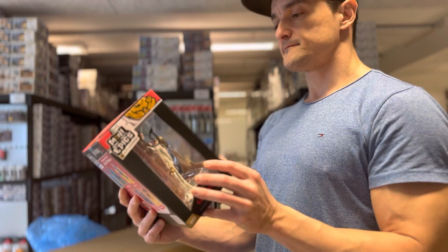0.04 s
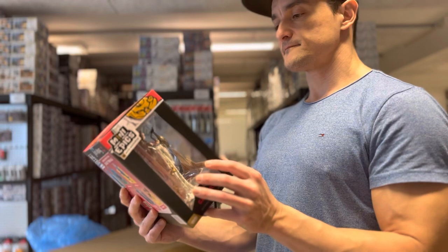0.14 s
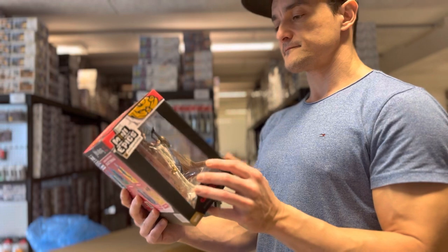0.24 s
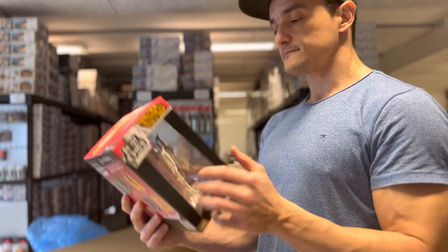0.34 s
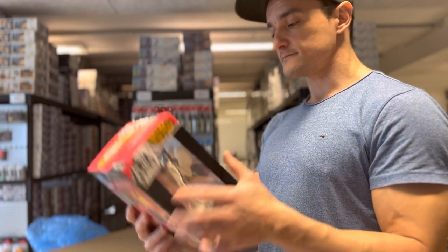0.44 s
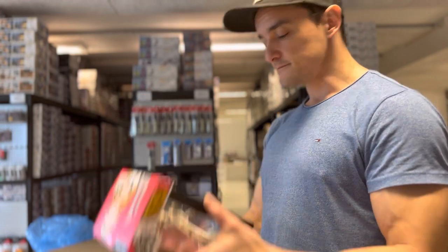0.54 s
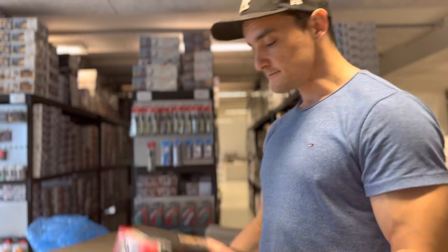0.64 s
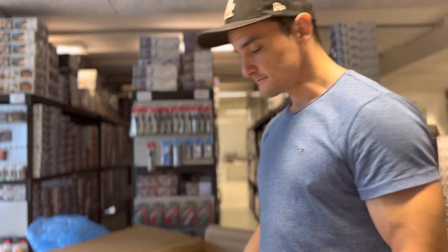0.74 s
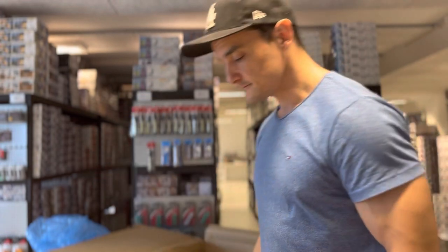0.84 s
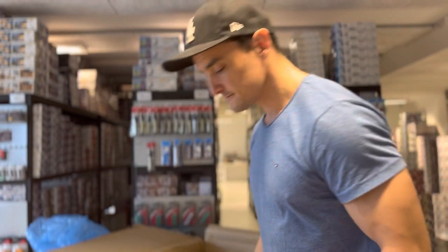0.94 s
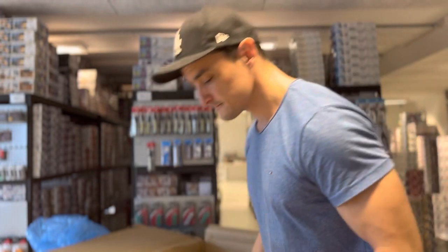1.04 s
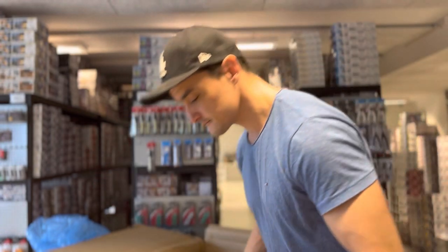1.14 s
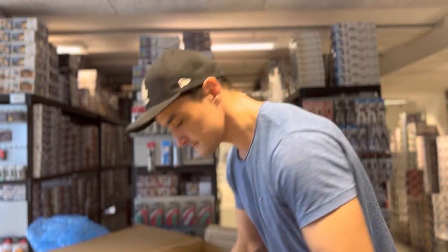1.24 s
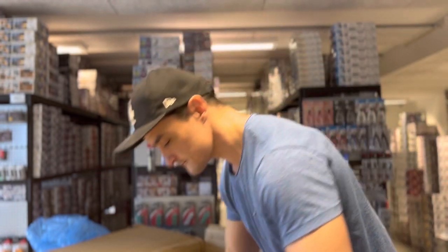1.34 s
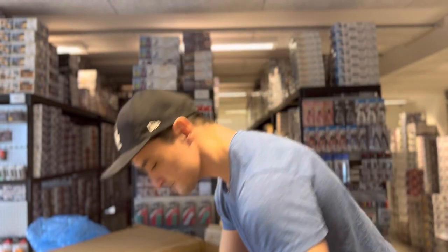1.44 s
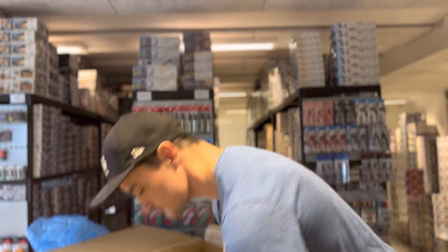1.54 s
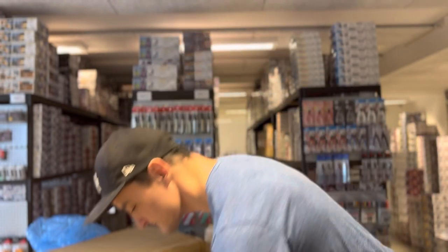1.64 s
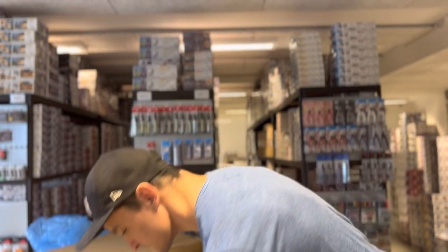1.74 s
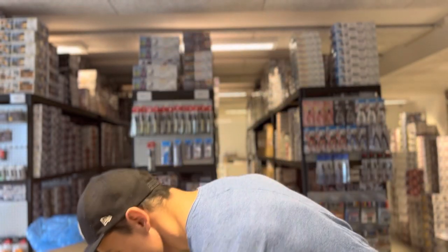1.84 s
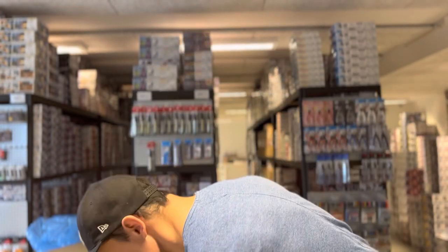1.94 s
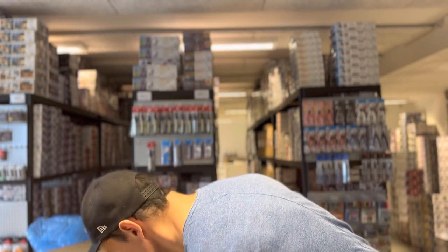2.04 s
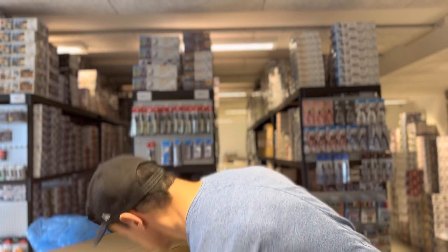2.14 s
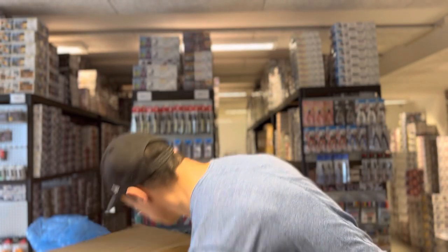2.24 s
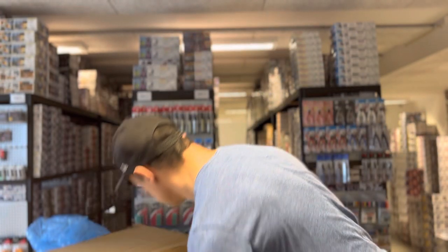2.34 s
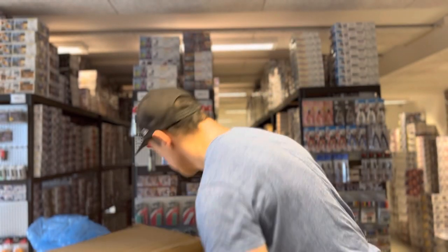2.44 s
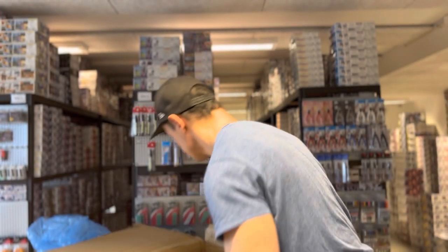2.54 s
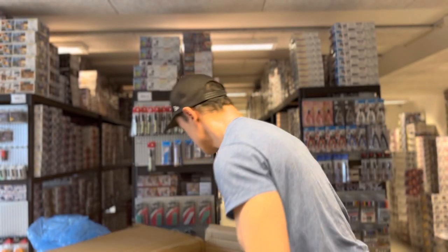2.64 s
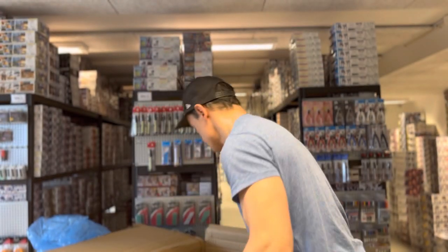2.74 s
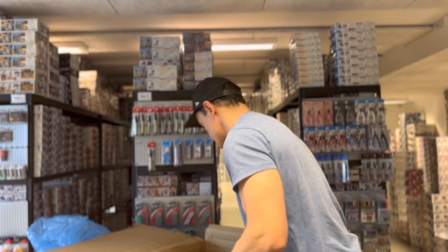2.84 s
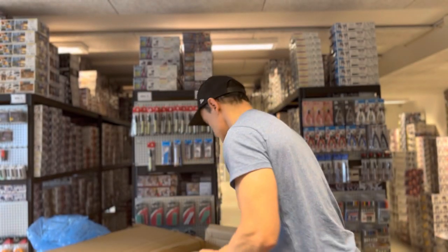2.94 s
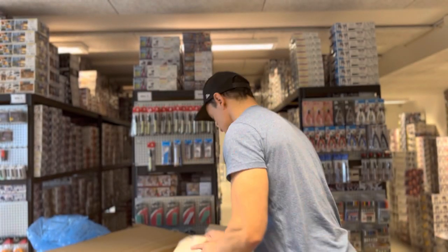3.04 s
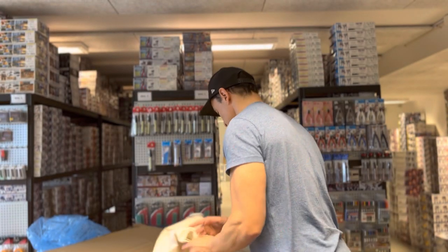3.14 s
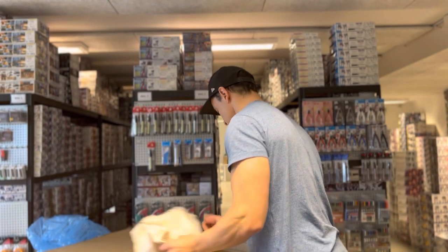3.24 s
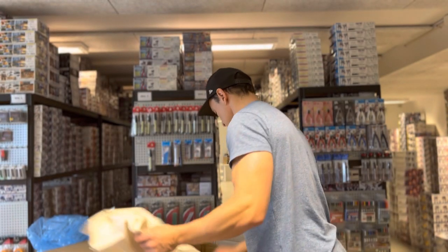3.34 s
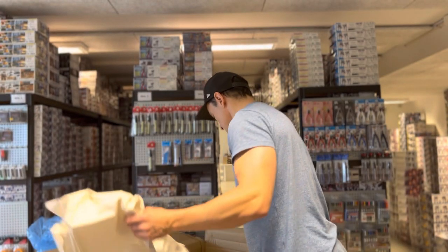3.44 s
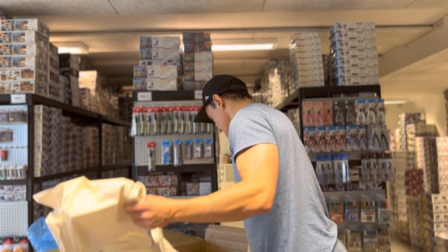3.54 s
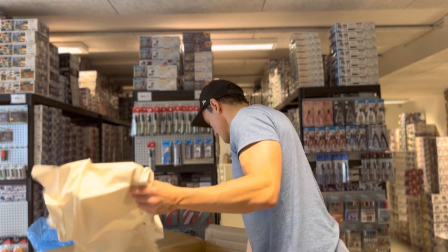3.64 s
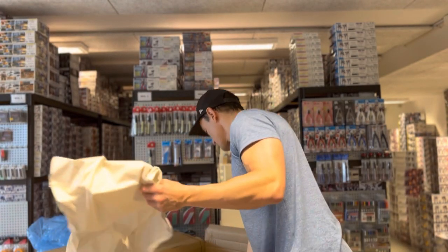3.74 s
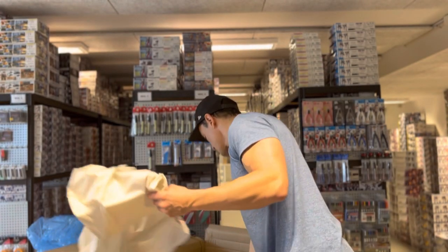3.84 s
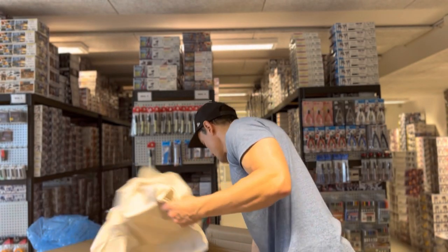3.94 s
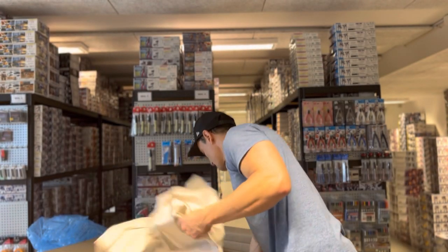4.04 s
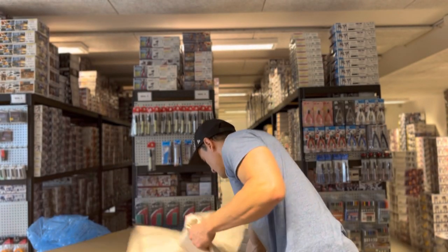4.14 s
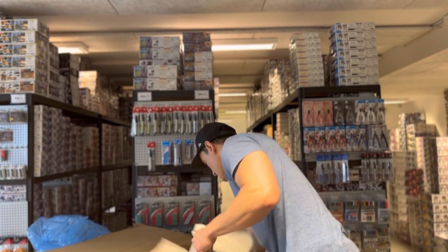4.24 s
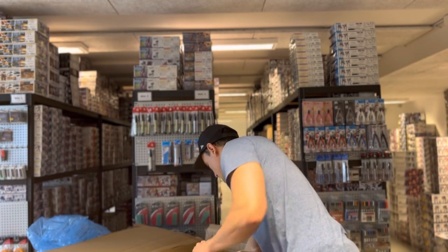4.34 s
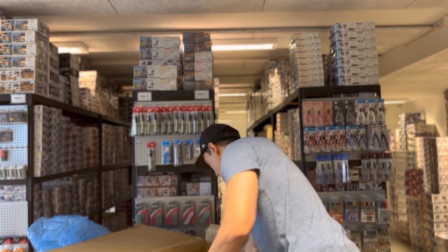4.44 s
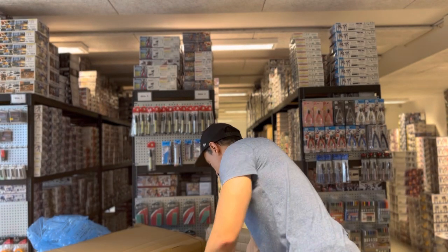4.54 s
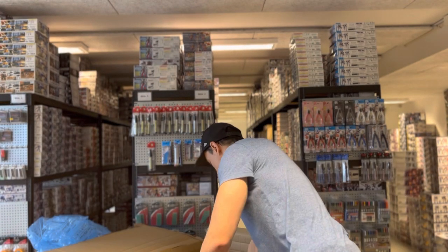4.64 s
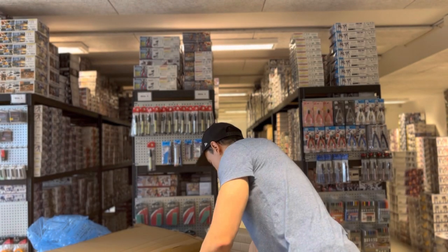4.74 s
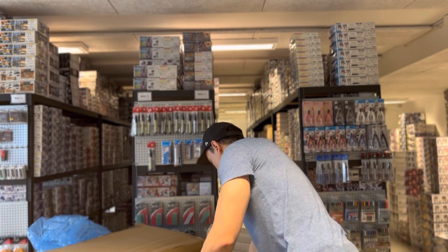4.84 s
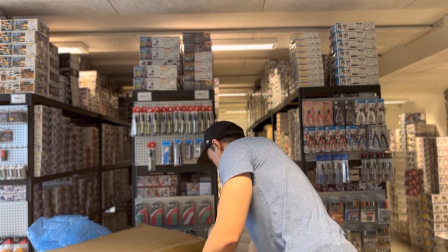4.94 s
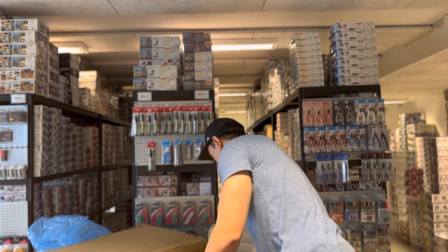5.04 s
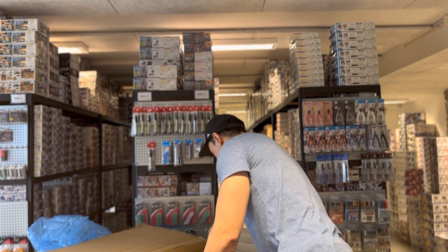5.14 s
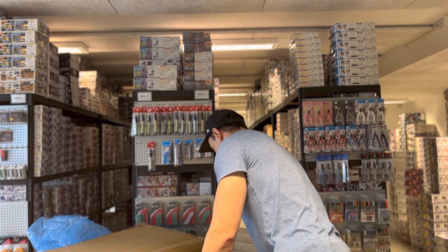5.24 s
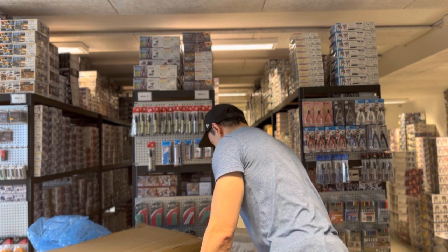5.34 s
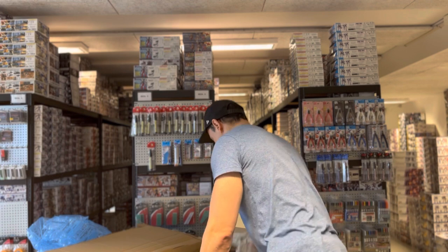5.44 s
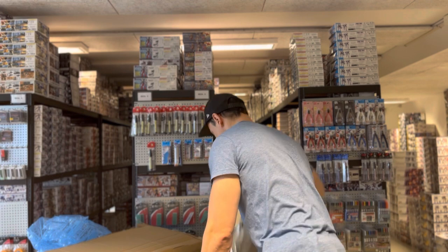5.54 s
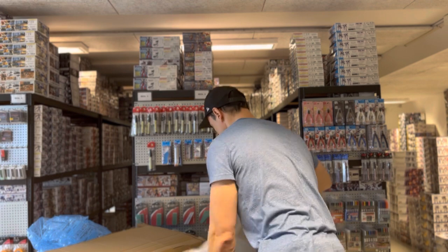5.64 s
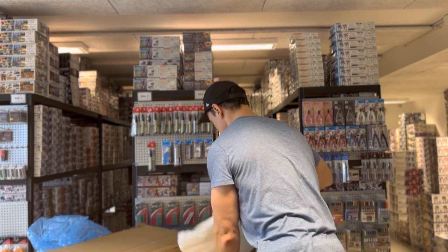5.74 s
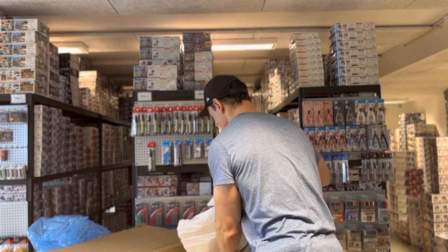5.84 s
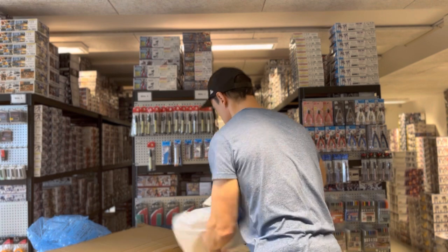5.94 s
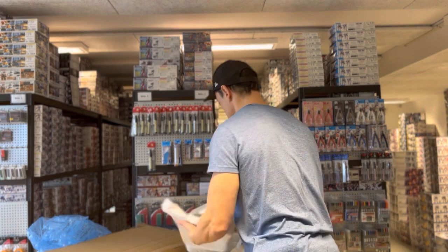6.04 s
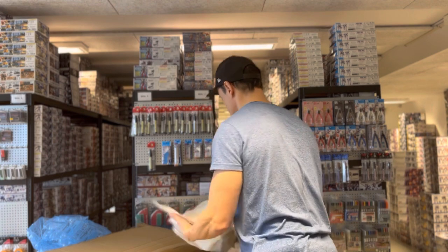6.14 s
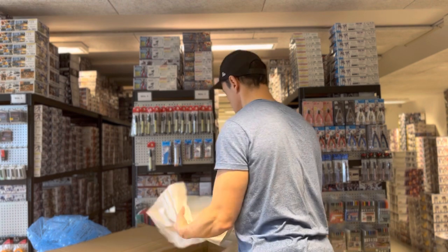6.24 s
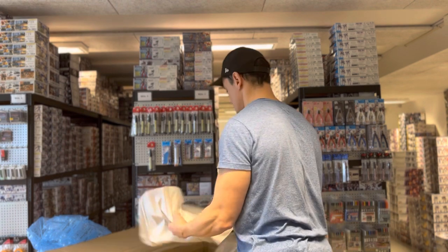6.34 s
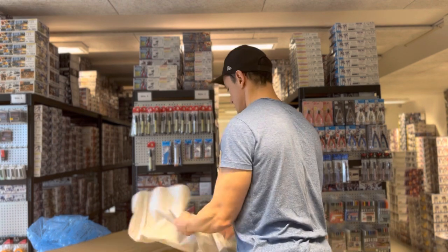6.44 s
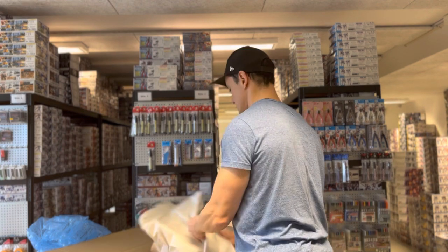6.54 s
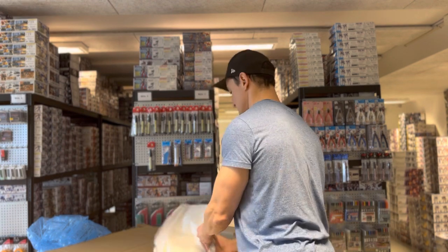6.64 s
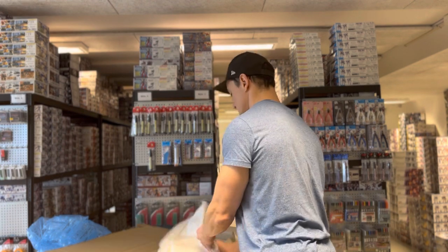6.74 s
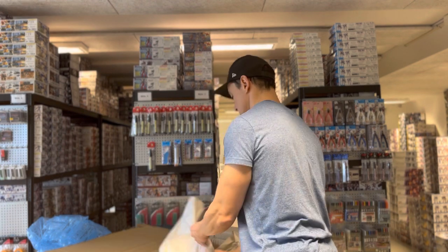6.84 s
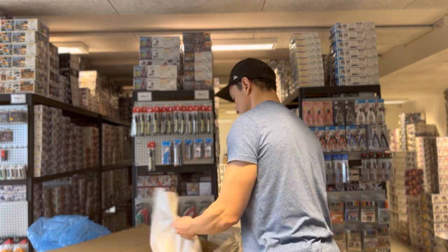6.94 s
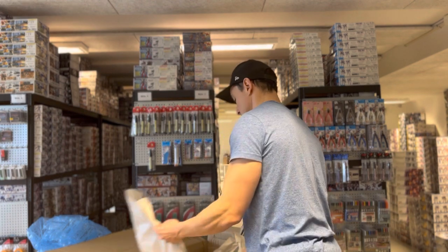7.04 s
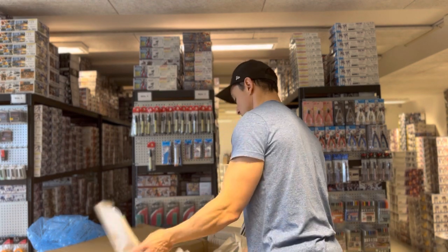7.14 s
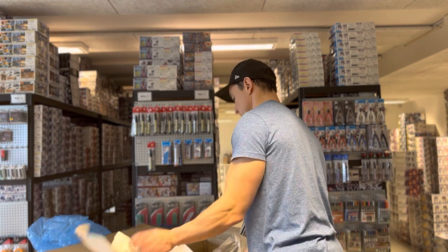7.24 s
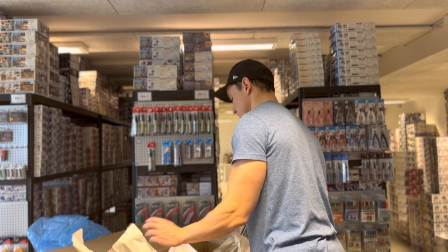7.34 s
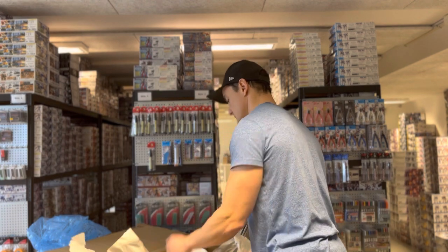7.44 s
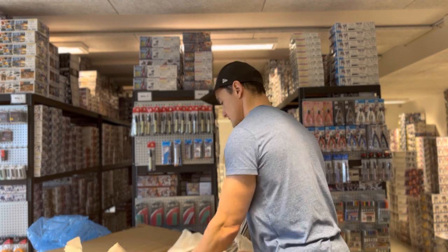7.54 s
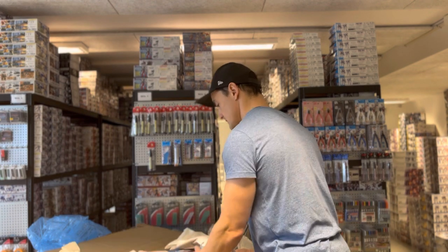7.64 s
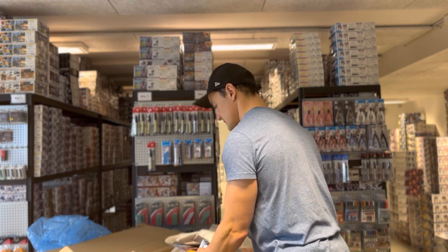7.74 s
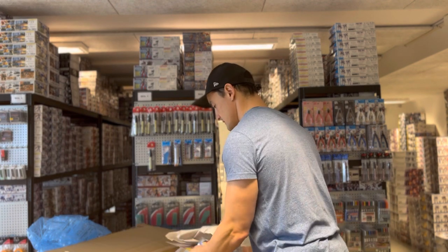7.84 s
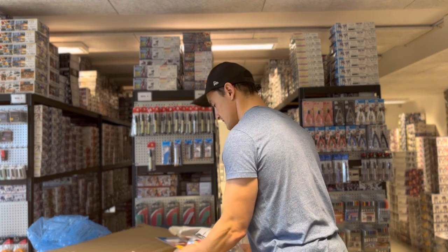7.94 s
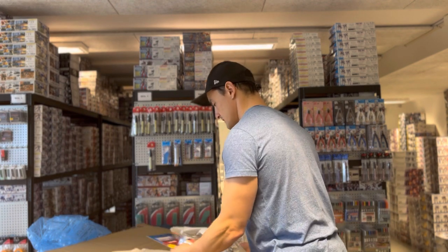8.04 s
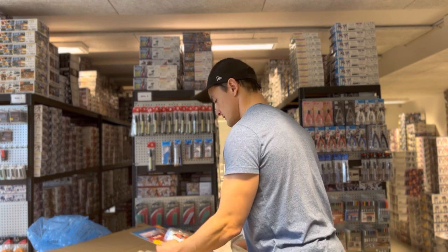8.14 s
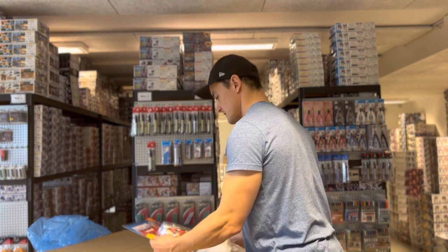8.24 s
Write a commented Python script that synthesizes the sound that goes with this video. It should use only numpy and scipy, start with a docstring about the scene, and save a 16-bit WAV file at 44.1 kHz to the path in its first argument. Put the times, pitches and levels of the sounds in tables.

```python
"""Faint ventilation runs throughout a stockroom. Hands rub and bump a cardboard carton, whose panels boom;
then a small boxed toy lands with a crack and a short ring, light taps follow and a fingertip squeaks.
The hands go deeper into the carton, then pull out packing paper: creases crackle in avalanches of clicks,
sheets slide and flap, and late on a shaken sheet billows. Filtered noise, clicks and fading tones make it all.
Full shelves give a short room; a phone with two microphone ports stands about a metre away."""
import sys
import numpy as np
from scipy import signal
from scipy.fft import rfft, irfft, next_fast_len
from scipy.io import wavfile
from scipy.ndimage import uniform_filter1d

SR = 44100
rng = np.random.default_rng(int(sys.argv[2]) if len(sys.argv) > 2 else 0)


def dump(signal):
    """Clip the signal to [-1, 1] and save it as 16-bit WAV at the path in sys.argv[1]."""
    limited = np.clip(np.atleast_2d(signal).T, -1, 1)
    pcm = np.round(limited * 32767).astype(np.int16)
    wavfile.write(sys.argv[1], SR, pcm)


N = 365148
T = np.arange(N) / SR

# Event levels are those of the loudest 3 ms, before the layer's own gain, the room and the phone.
# Colours are the shape of a spectrum: (frequency [Hz], level per Hz [dB]).
# Resonances are fading tones: (frequency [Hz], level [dB], time to fade by 60 dB [s]).

# colour of the ventilation, and its level before the phone's filters
AIR_COLOUR = [(20, -12), (45, 9.5), (70, 4.5), (120, -1), (250, -8), (450, -13), (900, -20.5),
              (2000, -26.5), (5000, -32.5), (9000, -38.5), (13000, -37.5), (15500, -46)]
AIR_DB = -69.5
# how unlike diffuse sound is at the two ports: (frequency [Hz], difference against sum [dB])
PORT_SPREAD = [(30, -16), (70, -17), (150, -12), (400, -3.5), (1500, -1), (1900, -10), (3000, -7),
               (6000, -4), (9000, -9), (15000, -9)]

# hands rubbing over cardboard, levels of the whole rub before gain:
# (time [s], length [s], scraping [dB], rumble of the panel [dB], swell from start to end [dB])
RUBS = [(0.255, 0.072, -71.5, -83, 12.5), (0.468, 0.18, -66, -67, -1), (0.661, 0.055, -68.5, -63, -1),
        (0.712, 0.18, -69.5, -61.5, -12), (1.105, 0.13, -70, -77, -5), (1.241, 0.066, -67, -65, 4.5),
        (1.317, 0.056, -74, -66, -3), (1.747, 0.066, -73.5, -48.5, -6), (1.812, 0.11, -97, -47, -10),
        (1.907, .13, -67.5, -50.5, 10), (2.047, 0.1, -69, -52, 5), (2.16, 0.11, -75.5, -64, -11),
        (2.273, 0.081, -74.5, -71.5, -2), (2.573, 0.029, -76.5, -85, -3)]
RUB_ATTACK_S, RUB_RELEASE_T60_S = 0.012, 0.06
# colour of a scrape, used for taps and the landing's crack too
SCRAPE_COLOUR = [(150, -24), (550, -11), (760, 1), (910, 4), (1010, 2), (1120, 7), (1500, 0), (1850, 3),
                 (2100, 1.5), (2500, 1), (2800, 1.5), (3250, 2.5), (4200, 0), (5000, -5), (7000, -6.5),
                 (11000, -7), (15500, -14)]
# colour of the cardboard itself, for rumbles and knocks
BOARD_COLOUR = [(30, -46), (80, 8), (200, 0.5), (290, 0.5), (430, 2), (550, -7.5), (900, -8), (1400, -11),
                (2200, -15), (6000, -18), (15000, -5)]

# knocks on cardboard, among them a nudge of the toy box at 1.2 s: (time [s], level [dB], low-pass of the
# contact [Hz], boom against clack [dB], # pitch of the panel that is hit [Hz])
KNOCKS = [(.305, -55.5, 404, -5, 250), (.332, -51.5, 500, -7, 400), (0.463, -54.5, 450, 6, 400),
          (0.487, -39, 420, -4, 110), (0.525, -41, 450, -9, 150), (.548, -41, 300, 6.5, 150),
          (.681, -41.5, 417, -5, 300), (.947, -63, 600, -7, 400), (1.201, -50, 603, -1, 524),
          (1.25, -56.5, 150, -9, 90), (1.707, -55, 300, -1, 220), (1.747, -43.5, 480, 5, 170),
          (1.785, -43, 350, 13, 150), (1.813, -47.5, 895, 2, 300), (1.823, -39.5, 700, 9, 250),
          (1.899, -49, 990, -3, 300), (1.945, -47, 1200, -8, 450), (1.962, -45, 1010, -1, 300),
          (1.986, -40.5, 420, 4, 140), (2.012, -49, 600, -7, 350), (2.025, -44.5, 910, -13, 400),
          (2.122, -46, 450, 11, 220), (2.533, -54.5, 497, -8, 300), (2.545, -60, 590, 0, 400),
          (3.262, -37, 191, 14, 160), (3.301, -42.5, 170, 4.5, 130), (4.743, -40, 220, 13, 150),
          (5.079, -37, 480, 3, 200), (5.106, -39, 500, -1, 180), (5.719, -30.5, 210, 18, 190),
          (5.739, -36, 170, 14, 140), (5.826, -33.5, 380, 12, 230), (6.648, -25.5, 650, 5, 380)]
# resonances of the carton's panels: (frequency [Hz], level [dB], fade [s])
CARTON_MODES = [(90, -10, 0.21), (147.4, 9, 0.19), (184, 6, 0.16), (208.5, 9.5, 0.17), (250.7, 4.5, 0.17),
                (310, 2, 0.12), (372, -11, .11), (450, -11, 0.053), (603, 6, 0.24)]

# light taps of fingers and box edges: (time [s], level [dB], ring of the lid against the tap [dB])
TAPS = [(.487, -48, 4), (0.524, -57, 2), (.581, -56, -12), (.727, -54, -3), (0.74, -55.5, 3),
        (1.124, -53, 0), (1.139, -45, 9), (1.282, -56, -1), (1.297, -60, 1), (1.985, -54, 7),
        (2.023, -60, 0), (2.097, -45.5, 4), (2.121, -52, -3)]
# resonances of the carton's stiff lid: (frequency [Hz], level [dB], fade [s])
LID_MODES = [(899, 9.5, 0.043), (1145, 2, 0.043), (1370, 0, 0.025), (1766, -4.5, 0.062), (2250, -2, .05),
             (2486, 2, 0.048), (4840, -10, .03)]

# the toy box set down and settling: (time [s], level [dB], low-pass of the ring [Hz])
LANDINGS = [(.523, -31.5, 1250), (.533, -42, 1000), (.543, -42, 597)]
# resonances of the stiff little toy box: (frequency [Hz], level [dB], fade [s])
TOY_BOX_MODES = [(332, -2, 0.14), (440, 1, 0.12), (548, 3, 0.13), (660, 8, 0.091), (780, 7, 0.07),
                 (980, 10, 0.058), (1150, -3, 0.033), (1290, -8, 0.037), (1420, -8, 0.04),
                 (1720, -17, 0.03), (1960, -10, 0.025), (2450, -12, 0.02)]

# slips of a fingertip on the glossy box: (time [s], level [dB])
SLIPS = [(.993, -68.5), (1.005, -73)]
# resonances of that squeak: (frequency [Hz], level [dB], fade [s])
SQUEAK_MODES = [(1940, -6, 0.022), (2180, -1, .012), (2480, -1, 0.01), (2850, -5, .012)]

# pulls and shakes of the paper, levels of the whole movement before gain:
# (time [s], length [s], level [dB], swell from start to end [dB],
# share of sliding rather than buckling [0-1], flapping against the level [dB])
PULLS = [(2.708, 0.11, -45.5, 3, 0.4, -5.5), (2.77, 0.25, -44, 2.5, 0.39, -7),
         (3.059, 0.18, -37, -11.5, 0.44, -7), (3.248, 0.12, -50, 0.5, 0.87, -3.5),
         (3.439, 0.15, -46, -6.5, 0.31, -11.5), (3.581, 0.058, -45.5, 6, 0.48, -11.5),
         (3.67, 0.2, -44, 1, 0.35, -8.5), (3.867, 0.2, -41.5, 2, 0.53, -6.5),
         (4.056, 0.53, -47.5, -11.5, 0.52, -4), (4.245, 0.39, -42, 1.5, 0.52, -3),
         (4.694, 0.23, -46.5, 1, 0.7, -1.5), (4.93, 0.29, -44, 1, 0.71, -4),
         (5.257, 0.42, -43.5, 1, 0.56, -5.5), (5.696, 0.1, -42.5, -2, 0.63, -5.5),
         (5.821, 0.045, -39, -11.5, 1, -5), (5.895, 0.057, -41.5, 0, 0.4, -7),
         (5.966, 0.032, -38.5, -1.5, 0.65, -6), (6.053, 0.1, -41, 6, 0.52, -8),
         (6.2, 0.39, -43.5, -9, 0.66, -7.5), (6.479, 0.18, -36, 11, 0.68, -9.5),
         (6.713, 0.11, -40, -3, 0.1, -3.5), (6.895, 0.27, -48.5, 7, 0.22, -25),
         (7.071, 0.039, -41, -6, 0.1, -5.5), (7.144, 0.17, -45, -5, 0.19, -6),
         (7.36, 0.21, -55.5, 14, 0.45, -13), (7.552, 0.29, -49, 0.5, 0.48, -11),
         (7.884, 0.094, -50.5, 0.5, 0.18, -3.5), (7.978, 0.054, -55.5, 2, 0.03, -8),
         (8.121, 0.12, -51, -10.5, 0.4, -4.5)]
PULL_ATTACK_S, PULL_RELEASE_T60_S = 0.016, 0.36
# once disturbed, the paper goes on creeping between pulls
SETTLING_DB, SETTLING_FLAP_DB = -65.5, -60
# small folds giving way, heard once the paper moves
FOLDS_PER_S, FOLD_SPREAD_DB, FOLD_T60_S = 65, 1, 0.06
# a harder pull sounds crisper, a sliding sheet duller
CRISP_DB, USUAL_PULL_DB, CRISP_PER_DB, SLIDING_DULL_DB = 9, -52, 0.6069, 24
# colour of buckling creases: (frequency [Hz], level per Hz [dB])
CREASE_COLOUR = [(60, -1), (200, -1.5), (450, 0), (800, 0.5), (1300, 2.5), (2200, 2.5), (3800, 3),
                 (5000, 0), (6300, -3.5), (7300, -4), (8600, -8), (12000, -7), (13800, -14), (15500, -27)]
# colour of the flapping sheet: (frequency [Hz], level per Hz [dB])
FLAP_COLOUR = [(25, -28), (50, -7.5), (78, 2.5), (105, -7.5), (145, 2.5), (178, -7), (208, 6), (245, -3),
               (300, -4), (450, -5), (900, -20), (2500, -67)]

# big creases giving way: (time [s], level [dB], time scale of the avalanche [s])
SNAPS = [(2.718, -44, 0.0071), (2.760, -34.5, 0.015), (2.795, -36, 0.011), (2.907, -43, 0.0097),
         (3.046, -36, 0.0023), (3.068, -24, 0.0055), (3.163, -32.5, 0.0081), (3.212, -34, 0.0012),
         (3.233, -34.5, 0.0042), (3.313, -41.5, 0.0017), (3.323, -44, .003), (3.4, -43, 0.0045),
         (3.408, -44.5, 0.023), (3.448, -41, 0.0022), (3.527, -40, 0.0038), (3.547, -40.5, .003),
         (3.602, -46, 0.018), (3.676, -36, 0.002), (3.687, -39, 0.0014), (3.812, -34, 0.0053),
         (3.879, -39.5, 0.0082), (3.94, -37.5, 0.0027), (3.985, -40, 0.019), (4.006, -29.5, 0.0093),
         (4.161, -42, .004), (4.265, -32.5, 0.012), (4.412, -32.5, 0.0071), (4.435, -35.5, 0.0079),
         (4.518, -35, 0.0055), (4.535, -33.5, 0.012), (4.61, -42, 0.0026), (4.661, -37, 0.0024),
         (4.805, -38, 0.014), (4.941, -40.5, 0.027), (5.608, -40, 0.015), (5.919, -29, 0.02),
         (5.985, -33, 0.017), (6.087, -34.5, 0.0028), (6.109, -38, 0.0094), (6.214, -38, 0.0075),
         (6.317, -42, 0.012), (6.433, -41, 0.012), (6.497, -30.5, 0.0045), (6.587, -29, 0.016),
         (6.618, -27, 0.017), (6.714, -36, .003), (6.75, -38, 0.0034), (6.786, -34, 0.019),
         (6.946, -44, .002), (7.067, -39, 0.0042), (7.084, -27.5, 0.0041), (7.099, -32, .009),
         (7.21, -36.5, 0.022), (7.351, -45.5, 0.01), (7.511, -42, 0.0049), (7.532, -43.5, 0.0061),
         (7.545, -50, .002), (7.561, -44, 0.0038), (7.592, -45, 0.0015), (7.613, -45.5, 0.0073),
         (7.639, -41, 0.0036), (7.681, -45, .0015), (7.711, -34.5, 0.0023), (7.733, -40.5, 0.001),
         (7.762, -44, 0.0088), (7.809, -41, 0.0027), (7.834, -39.5, 0.0048), (7.893, -40, 0.0027),
         (7.91, -41.5, 0.01), (7.969, -48, 0.0046), (8.066, -50, 0.0042), (8.133, -47, 0.006),
         (8.165, -45, 0.0032), (8.181, -37.5, 0.0058), (8.215, -44, 0.011)]
# the shorter the avalanche, the brighter it is
SNAP_TILT_DB, SNAP_USUAL_S, SNAP_TILT_DB_PER_HALVING = 10, 0.0096, 5.5

# flaps of the shaken sheet: (time [s], level [dB])
WHUMPS = [(6.657, -23), (6.673, -25.5), (6.688, -34)]
# resonances of the billowing sheet: (frequency [Hz], level [dB], fade [s])
BILLOW_MODES = [(77, 1, 0.056), (130, 3, 0.093), (193, 5, 0.058)]

# levels against the direct sound, before the reflections' bass is thinned
ROOM_T60_S, ROOM_DB, EARLY_T60_S, EARLY_DB = 0.19, -6.5, 0.028, -5
# the phone's two ports: (frequency [Hz], phase by which the left leads [rad], left minus right [dB])
PORTS = [(20, 0, .5), (1600, 0, .2), (3000, 1, 3), (4900, .7, 2.7), (5700, -.5, 1.3), (6600, -.9, 1.7),
         (7700, -3, 0), (8700, -3.2, 0), (10000, -4.7, 0), (11200, -6.2, 0), (13300, -6.4, 0),
         (14400, -9.2, 0)]
TOP_HZ = 15700


def undb(db):
    """Turn decibels into a gain."""
    return 10 ** (np.asarray(db) / 20)


def unit(x):
    """Scale to an average (rms) level of 1."""
    return x / np.sqrt(np.mean(x ** 2) + 1e-24)


def crest(x, size=130):
    """Scale so that the loudest three milliseconds have rms 1."""
    return x / np.sqrt(uniform_filter1d(x ** 2, size).max() + 1e-24)


def add(track, s, x):
    """Mix a sound into a track at time s."""
    i = max(int(s * SR), 0)
    track[i:i + len(x)] += x[:max(N - i, 0)]


def colour(x, points, size=4096):
    """Filter to a given spectrum, so that no sound comes ahead of its cause (minimum phase)."""
    hz, db = np.transpose(points)
    f = np.maximum(np.arange(size // 2 + 1) * SR / size, 1)
    gain = undb(np.interp(np.log(f), np.log(hz), db))
    # folding the cepstrum forward in time makes the filter causal
    cepstrum = irfft(np.log(gain))
    cepstrum[1:size // 2] *= 2
    cepstrum[size // 2 + 1:] = 0
    response = irfft(np.exp(rfft(cepstrum)))
    return signal.oaconvolve(x, response)[:len(x)]


def lowpass(x, hz, order=2):
    """Butterworth low-pass: dull a sound above hz."""
    return signal.sosfilt(signal.butter(order, min(hz, SR / 2 - 1), fs=SR, output="sos"), x)


def highpass(x, hz):
    """Butterworth high-pass: thin a sound below hz."""
    return signal.sosfilt(signal.butter(1 * 2, hz, "high", fs=SR, output="sos"), x)


def tilt(x, db, pivot_hz=3000):
    """Raise the treble against the lows."""
    low = lowpass(x, pivot_hz, order=1)
    return low * undb(-db / 2) + (x - low) * undb(db / 2)


def fade(t, t60):
    """Die away by 60 dB in t60 seconds."""
    return np.exp(-np.log(1000) * t / t60)


def clicks(n, rate, spread_db):
    """Clicks at random moments, rate per second on average: many small and a few large."""
    chance = rng.random(n) * SR / rate
    at = np.flatnonzero(chance < 1)
    size_db = spread_db * np.minimum(-np.log(chance[at]), 3.5)
    out = np.zeros(n)
    out[at] = (-1.) ** at * undb(size_db)
    return out


def steady(x, size=3500):
    """Even out the slow level of a stream of grains, keeping its fine grain."""
    slow_power = np.maximum(uniform_filter1d(x ** 2, size), 0)
    return x / np.sqrt(slow_power + np.mean(x ** 2) / 100)


def catches(rate, spread_db, t60):
    """Sudden small slips at irregular moments, each dying away: an envelope of rms 1."""
    slips = np.abs(clicks(N, rate, spread_db))
    return unit(signal.oaconvolve(slips, fade(T[:SR // 10], t60))[:N])


def stroke(length, swell_db, attack_s, release_t60):
    """Loudness of one movement: a quick attack, a hold that swells or sags, a release."""
    t = T[:int((length + release_t60) * SR)]
    attack = np.minimum(t / attack_s, 1)
    hold = undb(swell_db * (np.minimum(t / length, 1) - .5))
    return attack * hold * fade(np.maximum(t - length, 0), release_t60)


def ringing(modes, t):
    """Fading tones; every strike excites them a little differently in level and pitch."""
    out = 0
    for hz, db, t60 in modes:
        gain = undb(db + 2 * rng.standard_normal())
        pitch = hz * (1 + 0.02 * rng.standard_normal())
        out = out + gain * np.sin(2 * np.pi * pitch * t) * fade(t, t60)
    return crest(out)


def blow(t, t60, contact=6):
    """A sharp contact followed by a short noisy chatter."""
    return contact * (t == 0) + rng.standard_normal(len(t)) * fade(t, t60)


def pair(n):
    """Diffuse noise at the two ports: alike in the bass, partly unrelated above."""
    mid, side = rng.standard_normal((2, n))
    return unit(mid + colour(side, PORT_SPREAD) * np.array([[1], [-1]]))


def ventilation():
    """Moving air is steady noise, strongest in the bass, arriving from all round."""
    return undb(AIR_DB) * unit(np.array([colour(side, AIR_COLOUR) for side in pair(N)]))


def hands(scrape_db=1, rumble_db=-2.0, thin_db=9, glide=1.8, rumble_hz=600):
    """Skin and box edges stick and slip on cardboard: fine grains scrape while the panel rumbles."""
    scraping, rumbling = np.zeros((2, N))
    for s, length, skin_db, panel_db, swell_db in RUBS:
        rub = stroke(length, swell_db, RUB_ATTACK_S, RUB_RELEASE_T60_S)
        add(scraping, s, undb(scrape_db + skin_db) * rub)
        add(rumbling, s, undb(rumble_db + panel_db) * rub)
    scrape = unit(colour(steady(clicks(N, 1800, 1.3)), SCRAPE_COLOUR))
    panel = lowpass(colour(steady(clicks(N, 700, 0.5)), BOARD_COLOUR), rumble_hz)
    # a rub stirs the panel's deepest bass less than a blow does
    rumble = unit(tilt(panel, thin_db, pivot_hz=180))
    grip = steady(glide + catches(70, 3.5, 0.086))
    return (scrape * scraping + rumble * rumbling) * grip


def knocks(gain_db=1, board_t60=0.1, push_cycles=0.63, off_panel_db_per_octave=7, size=18000):
    """A blow clacks the board and booms the panel it hits; a soft contact pushes longer and is duller."""
    out, t = np.zeros(N), T[:size]
    for s, db, bright_hz, boom_db, panel_hz in KNOCKS:
        clack = lowpass(colour(blow(t, board_t60), BOARD_COLOUR), bright_hz)
        modes = []
        for hz, mode_db, t60 in CARTON_MODES:
            octaves_off = abs(np.log2(hz / panel_hz))
            modes.append((hz, mode_db - off_panel_db_per_octave * octaves_off, t60))
        boom = lowpass(ringing(modes, t), bright_hz)
        push = 1 - np.exp(-t * bright_hz / push_cycles)
        knock = push * (crest(clack) + undb(boom_db) * crest(boom))
        add(out, s, undb(db + gain_db) * crest(knock))
    return out


def taps(tap_t60=0.021, chatter_t60=0.01, size=8000):
    """Fingers and box edges tick against the carton's stiff lid, which rings briefly."""
    out, t = np.zeros(N), T[:size]
    for s, db, ring_db in TAPS:
        ring = signal.fftconvolve(ringing(LID_MODES, t), blow(t, chatter_t60))[:size]
        tick = colour(blow(t, tap_t60), SCRAPE_COLOUR)
        add(out, s, undb(db) * crest(crest(tick) + undb(ring_db) * crest(ring)))
    return out


def landing(chatter_t60=0.013, crack_db=-5, crack_t60=0.031, crack_ratio=0.76, size=9000):
    """The toy box lands with a crack that dies fast, then chatters and rings on in its lower modes."""
    out, t = np.zeros(N), T[:size]
    for s, db, bright_hz in LANDINGS:
        chattering = signal.fftconvolve(ringing(TOY_BOX_MODES, t), blow(t, chatter_t60))[:size]
        ring = lowpass(chattering, bright_hz, order=3)
        crack = lowpass(colour(blow(t, crack_t60), SCRAPE_COLOUR), crack_ratio * bright_hz, order=4)
        add(out, s, undb(db) * crest(crest(ring) + undb(crack_db) * crest(crack)))
    return out


def squeak(rise_s=.0015, size=5000):
    """A fingertip slips twice and the box chirps faintly in a few short tones."""
    out, t = np.zeros(N), T[:size]
    for s, db in SLIPS:
        chirp = ringing(SQUEAK_MODES, t) * (1 - np.exp(-t / rise_s))
        add(out, s, undb(db) * crest(chirp))
    return out


def reaching_in(x, inside_s=1.6, wall_hz=5200):
    """Once the hands are down in the carton, its walls shade the treble of their rubs and taps."""
    return np.where(T < inside_s, x, lowpass(x, wall_hz, order=1))


def pulling():
    """What the pulls add up to: the paper's level, its share of sliding, and the level of its flapping."""
    disturbed = T > PULLS[0][0]
    power = disturbed * undb(SETTLING_DB) ** 2
    flap_power = disturbed * undb(SETTLING_FLAP_DB) ** 2
    slide_power = np.zeros(N)
    for s, length, db, swell_db, share, flap_db in PULLS:
        pull = undb(db) * stroke(length, swell_db, PULL_ATTACK_S, PULL_RELEASE_T60_S)
        add(power, s, pull ** 2)
        add(slide_power, s, np.clip(share, 0, 1) * pull ** 2)
        add(flap_power, s, (undb(flap_db) * pull) ** 2)
    return np.sqrt(power), slide_power / (power + 1e-18), np.sqrt(flap_power)


def rustle(x, level, sliding):
    """Give a stream of grains the paper's colour, and the level and crispness of the pull."""
    force_db = 20 * np.log10(np.maximum(level, undb(SETTLING_DB))) - USUAL_PULL_DB
    crisp_db = CRISP_DB + CRISP_PER_DB * force_db - SLIDING_DULL_DB * sliding
    return tilt(unit(colour(x, CREASE_COLOUR)), crisp_db) * level


def facet(hz, ring_db=-2, cycles=5, tick_db=-4, flutter_t60=0.0063, size=512):
    """One patch of paper popping over: a sharp tick, a brief flutter and a few cycles at its own pitch."""
    t = T[:size]
    tick = 1. * (t == 0)
    flutter = rng.standard_normal(size) * fade(t, flutter_t60)
    ring = np.sin(2 * np.pi * hz * t) * fade(t, cycles / hz)
    return unit(undb(tick_db) * unit(tick) + unit(flutter) + undb(ring_db) * unit(ring))


def bending(x, shift_db=3.0, shift_hz=22, count=7):
    """As the sheet bends, facets of other sizes take over and the colour of the crackle shifts."""
    spectrum, out = rfft(x), 0
    pitch = np.log(np.maximum(np.arange(len(spectrum)) * SR / N, 1))
    centres = np.log(np.geomspace(600, 11000, count))
    # each band's level wanders on its own; the bands overlap and add up to the whole
    for band in np.eye(count):
        drift = unit(lowpass(rng.standard_normal(N), shift_hz))
        part = irfft(spectrum * np.interp(pitch, centres, band), N)
        out = out + undb(shift_db * drift) * part
    return out


def crinkle(folds, rate=70, spread_db=0.66, creep=1.0, count=16):
    """Facets of many sizes buckle at random, strongest in the avalanche after each small fold."""
    pops = np.zeros(N)
    for hz in np.geomspace(700, 7000, count):
        pops += signal.oaconvolve(clicks(N, rate, spread_db), facet(hz))[:N]
    return steady(bending(pops) * (creep + folds), size=2600)


def paper(level, sliding, flapping, folds, crinkle_db=1, flap_db=-2, tick_db=-10.5, tick_tilt_db=15,
          tick_t60=0.015):
    """Creases crinkle and stiff edges tick sharply; the whole sheet flaps and drums on the carton."""
    buckling = np.sqrt(1 - sliding)
    creases = undb(crinkle_db) * rustle(crinkle(folds), level, sliding)
    edges = signal.oaconvolve(clicks(N, 60, 3.6), blow(T[:400], tick_t60))[:N]
    edges = steady(tilt(edges, tick_tilt_db, pivot_hz=5000), size=9000)
    # buckling acts twice on the ticks, so they thin out fastest as the sheet slides
    ticks = undb(tick_db) * buckling * rustle(edges, level, sliding)
    flap = unit(colour(steady(clicks(N, 300, 0.78)), FLAP_COLOUR))
    return (creases + ticks) * buckling + undb(flap_db) * flap * flapping


def sheet_hiss(level, sliding, folds, hiss_db=-1, glide=1.0, fold_share=0.23):
    """Sheet drags on sheet in tiny catches and jerks at folds; its breadth reaches the ports from all round."""
    grip = steady(glide + catches(330, 1.5, 0.014) + fold_share * folds)
    drag = undb(hiss_db) * grip * np.sqrt(sliding)
    return drag * np.array([rustle(side, level, sliding) for side in pair(N)])


def snaps(gain_db=1.5, build_up=0.37, lead_db=-8, lead_tilt_db=9, size=8000, count=4):
    """A big crease gives way with a bright crack; an avalanche of pops over several facets follows and dies."""
    out, t = np.zeros(N), T[:size]
    for s, db, length in SNAPS:
        length = max(length, .001)
        tilt_db = SNAP_TILT_DB + SNAP_TILT_DB_PER_HALVING * np.log2(SNAP_USUAL_S / length)
        age = t / length
        run = np.exp(-age) * (1 - np.exp(-age / build_up))
        pops = np.zeros(size)
        for _ in range(count):
            popping = clicks(size, 700, 2.14) * run
            pops += signal.fftconvolve(popping, facet(rng.uniform(620, 9700)))[:size]
        crack = tilt(rng.standard_normal(size) * fade(t, 0.0077), lead_tilt_db, pivot_hz=6000)
        snap = crest(pops) + undb(lead_db + tilt_db) * crest(crack)
        snap = tilt(colour(snap, CREASE_COLOUR), tilt_db)
        add(out, s, undb(db + gain_db) * crest(snap))
    return out


def whump(rise_s=0.0032, size=8000):
    """The shaken sheet fills with air and flaps a few times, each flap weaker."""
    out, t = np.zeros(N), T[:size]
    for s, db in WHUMPS:
        flap = ringing(BILLOW_MODES, t) * (1 - np.exp(-t / rise_s))
        add(out, s, undb(db) * crest(flap))
    return out


def echoes(dull_hz=7000, bass_hz=240, size=16000):
    """From one spot: direct sound, quick reflections off carton and table, a short tail among the shelves."""
    t = T[:size]
    early = pair(size) * fade(t, EARLY_T60_S) * (t > .0015)
    tail = lowpass(pair(size) * fade(t, ROOM_T60_S) * (t > .009), dull_hz, order=1)
    response = (undb(EARLY_DB) * unit(early) + undb(ROOM_DB) * unit(tail)) / np.sqrt(size)
    # long waves pass round the shelves and scatter less
    response = signal.sosfilt(signal.butter(1, bass_hz, "high", fs=SR, output="sos"), response)
    response[:, 0] += 1  # the direct sound
    return response / np.sqrt(np.sum(response ** 2) / 2)


def stockroom(x, size=5000):
    """Hands and paper keep moving, so the pattern of reflections changes from moment to moment."""
    out, window = np.zeros((2, N)), np.hanning(2 * size)
    # overlapping pieces fade into each other, each with echoes of its own
    for i in range(0, N, size):
        piece = x[i:i + 2 * size]
        piece = piece * window[:len(piece)]
        heard = signal.fftconvolve(piece[None], echoes(), axes=1)
        for channel, sound in zip(out, heard):
            add(channel, (i + .5) / SR, sound)  # half a sample guards against rounding down
    return out


def scene():
    """All the handling in the room, over faint ventilation."""
    air = ventilation()
    cardboard = reaching_in(hands() + taps()) + knocks() + landing() + squeak()
    level, sliding, flapping = pulling()
    folds = catches(FOLDS_PER_S, FOLD_SPREAD_DB, FOLD_T60_S)
    packing = paper(level, sliding, flapping, folds) + snaps() + whump()
    # the hiss already comes from all round, so it gets no echoes
    return stockroom(cardboard + packing) + sheet_hiss(level, sliding, folds) + air


def record(dry, low_cut_hz=44):
    """The phone's two ports differ in phase and level towards the treble; deep bass and the top are cut."""
    size = next_fast_len(N + 4096)  # spare room keeps the end from wrapping onto the start
    f = np.arange(size // 2 + 1) * SR / size
    hz, lead, balance_db = np.transpose(PORTS)
    half = np.array([[1], [-1]]) / 2  # each port takes half the difference
    gain = undb(half * np.interp(f, hz, balance_db))
    phase = np.exp(1j * half * np.interp(f, hz, lead))
    heard = irfft(rfft(dry, size) * gain * phase, size)[:, :N]
    heard = highpass(heard, low_cut_hz)
    return signal.sosfilt(signal.ellip(10, .2, 80, TOP_HZ, fs=SR, output="sos"), heard)


dry = scene()
out = record(dry)
dump(out)
```